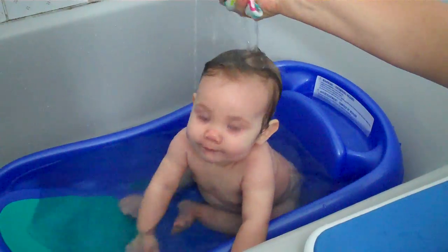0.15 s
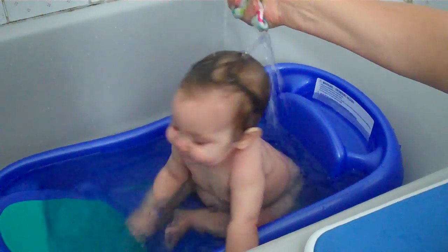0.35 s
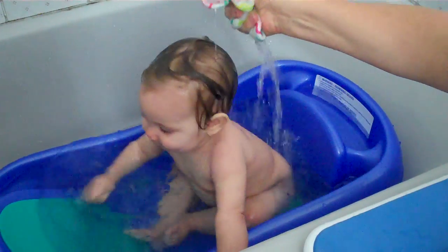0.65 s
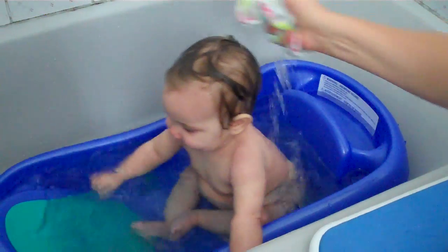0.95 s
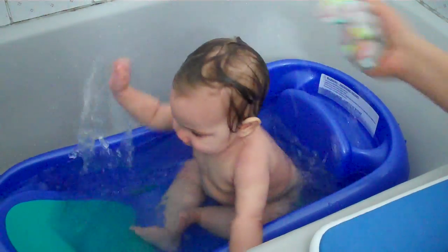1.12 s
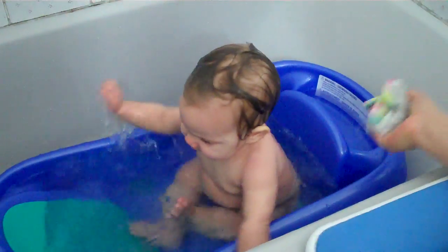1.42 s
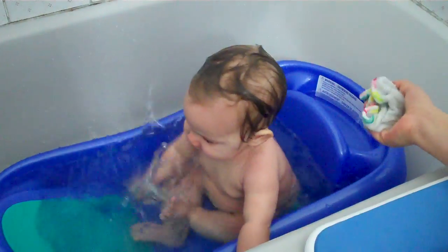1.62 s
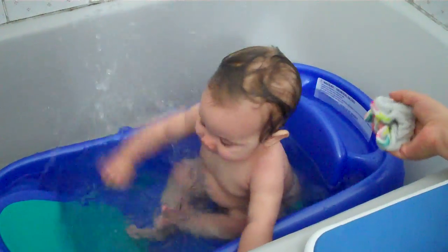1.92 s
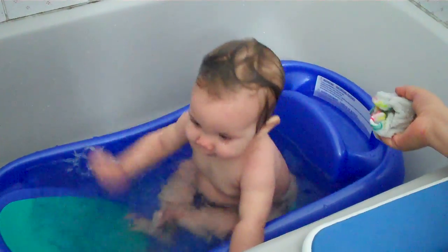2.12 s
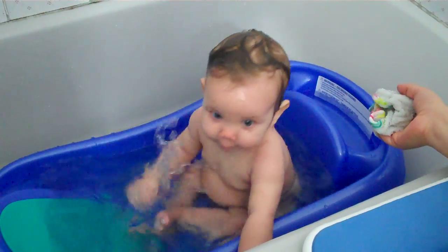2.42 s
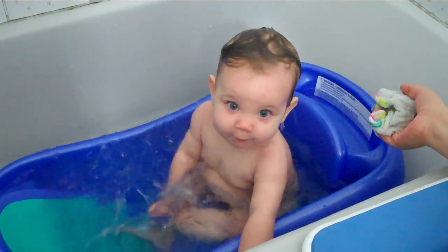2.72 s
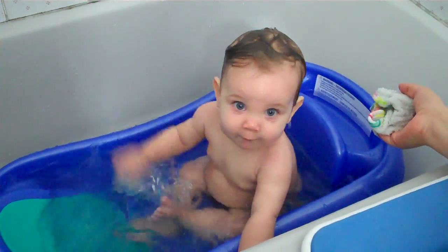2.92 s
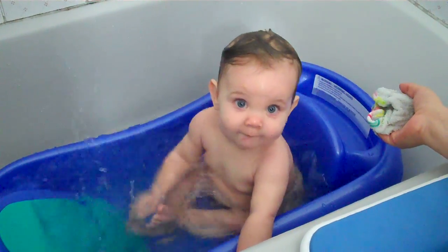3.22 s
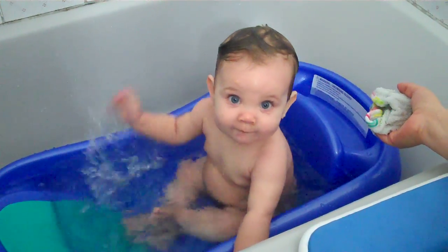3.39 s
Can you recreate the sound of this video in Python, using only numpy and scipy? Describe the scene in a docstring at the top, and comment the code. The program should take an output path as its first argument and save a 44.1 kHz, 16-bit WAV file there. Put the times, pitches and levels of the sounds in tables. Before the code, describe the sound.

A small hand slaps bathwater in a plastic tub, with sharp splashes, plinking droplets and fizz

```python
"""Faint air noise, fizzing water and a few small drops; then a small hand slaps the water of a plastic tub
in a tiled bathroom and a wrung cloth trickles into it. Bubbles are rising, decaying sines; splashes are
filtered clicks with scattered droplets; cracks are noise bursts; the churn is a bank of ringing resonators.
The stream is noise in tub resonances. Tub echoes and a short room tail follow; two close ports pick it up."""
import sys
import numpy as np
from scipy import signal
from scipy.fft import rfft, irfft, next_fast_len
from scipy.io import wavfile
from scipy.ndimage import uniform_filter1d

SR = 44100
rng = np.random.default_rng(int(sys.argv[2]) if len(sys.argv) > 2 else 0)


def generate_wav(signal):
    """Clip the signal to [-1, 1] and save it as 16-bit WAV at the path in sys.argv[1]."""
    frames = np.transpose(np.atleast_2d(signal))
    scaled = np.clip(frames, -1, 1) * 32767
    pcm = np.round(scaled).astype(np.int16)
    wavfile.write(sys.argv[1], SR, pcm)


def gain_from_decibels(decibels):
    """Convert decibel values to linear amplitude factors."""
    exponent = np.asarray(decibels, float) / 20
    return 10 ** exponent


N = 156555
TIME_S = np.arange(N) / SR
EVENT_S = np.arange(SR // 3) / SR


def rms_one(x):
    """Scale to unit rms."""
    return x / np.sqrt(np.mean(x ** 2) + 1e-20)


def at_hz(points, hz):
    """Read a (frequency, value) curve on a log-frequency axis."""
    p = np.array(points, float)
    return np.interp(np.log(hz + 1), np.log(p[:, 0] + 1), p[:, 1])


def shaped(x, gain):
    """Filter by a gain that is a function of frequency."""
    size = next_fast_len(x.shape[-1])
    hz = np.arange(size // 2 + 1) * SR / size
    return irfft(rfft(x, size) * gain(hz), size)[..., :x.shape[-1]]


def band_pass(x, order, low_hz, high_hz):
    """Butterworth band-pass."""
    return signal.sosfilt(signal.butter(order, [low_hz, high_hz], "band", fs=SR, output="sos"), x)


def ring(x, hz, r, zeros):
    """Two-pole resonator with pole radius r."""
    return signal.lfilter(zeros, [1, -2 * r * np.cos(2 * np.pi * hz / SR), r * r], x)


def two_ears(pair, likeness):
    """Mix two unrelated signals to left and right with a set likeness at each frequency."""
    def alike(hz):
        return np.clip(at_hz(likeness, hz), -.99, .99)
    mid = shaped(pair[0], lambda hz: np.sqrt(1 + alike(hz)))
    side = shaped(pair[1], lambda hz: np.sqrt(1 - alike(hz)))
    return np.array([mid + side, mid - side]) / np.sqrt(2)


def grains(per_s, spread_db, size):
    """Random clicks of uneven size and sign."""
    chance, rarity, sign = rng.random((3, size))
    heights = gain_from_decibels(-spread_db * np.log(rarity + 0.0022))
    return (chance < per_s / SR) * heights * np.sign(sign - .5) + 1e-18


def add(out, start_s, sound):
    """Mix a sound in at its start time."""
    i = int(start_s * SR)
    out[i:i + len(sound)] += sound


# CYCLES: cycles per 60 dB of decay; RISE: fractional pitch rise per s
DROP_CYCLES, DROP_RISE_PER_S, GLUG_RISE_PER_S = 40.8, 7, 4.0


def bubble(hz, t60_s, rise_per_s, attack_s, size=None):
    """A decaying sine whose pitch climbs as the bubble nears the surface."""
    t = EVENT_S[:size]
    tone = np.sin(2 * np.pi * hz * (t + rise_per_s * t ** 2 / 2))
    return tone * gain_from_decibels(-60 * t / t60_s) * (1 - np.exp(-t / attack_s))


GRAINS_PER_S, GRAIN_SPREAD_DB, SPLASH_ATTACK_S = 800, 1.67, 0.0014
DROPLETS, DROPLETS_DB, DROPLET_CYCLES, DROPLET_SPREAD_DB = 18, 6.5, 25.6, 5.5


def splash(hz, octaves, t60_s, attack_s=SPLASH_ATTACK_S):
    """Tiny impacts and scattered droplets around one pitch, dying away."""
    half = 2 ** (octaves / 2)
    grit = band_pass(grains(GRAINS_PER_S, GRAIN_SPREAD_DB, len(EVENT_S)), 2, hz / half, hz * half)
    when, pitch, size = rng.random((3, DROPLETS))
    starts_s = np.minimum(when ** 1.5 * t60_s, .3)
    pitches_hz = hz * 2 ** (octaves * (pitch - .5))
    levels = gain_from_decibels(DROPLET_SPREAD_DB * (4.46 * size - 3))
    plinks = np.zeros(2 * len(EVENT_S))
    for start_s, p, level in zip(starts_s, pitches_hz, levels):
        plink = bubble(p, DROPLET_CYCLES / p, DROP_RISE_PER_S, 0.00025, int(SR * 30 / p))
        add(plinks, start_s, level * plink)
    mix = rms_one(grit) + gain_from_decibels(DROPLETS_DB) * plinks[:len(EVENT_S)]
    return mix * gain_from_decibels(-60 * EVENT_S / t60_s) * (1 - np.exp(-EVENT_S / attack_s))


# air noise spectrum: (frequency [Hz], density [dB per Hz])
AIR_SPECTRUM = [(12, -17), (35, -7), (95, -29.5), (140, -17.5), (300, -17), (1000, -15.5), (3500, -13.5),
                (8600, -16.5), (11000, -30), (15000, -74)]
# left-right likeness of the air: (frequency [Hz], likeness [-1..1])
AIR_LIKENESS = [(25, 0.99), (60, 0.88), (600, 0.72), (10000, 0.14)]
AIR_DB = -49.5


def air():
    """Steady coloured noise, less alike left to right in the treble."""
    noise = two_ears(rng.standard_normal((2, N)), AIR_LIKENESS)
    return gain_from_decibels(AIR_DB) * rms_one(shaped(noise, lambda hz: gain_from_decibels(at_hz(AIR_SPECTRUM, hz))))


# fizz of the water over time: (time [s], level [dB])
CHURN_LEVEL = [(0, -67), (.2, -59), (.26, -43.5), (.5, -49), (.62, -34.5), (1.05, -44), (1.35, -40.5),
               (1.58, -43), (1.8, -38), (2.15, -37), (2.4, -40.5), (2.53, -44.5), (2.7, -41.5), (2.98, -47),
               (3.15, -43), (3.36, -49.5), (3.55, -47)]
# fizz spectrum: (frequency [Hz], density [dB per Hz])
FIZZ_SPECTRUM = [(240, -42), (400, -23), (1370, -11.5), (2390, 0), (8820, 1), (12700, -4.5), (14300, -46)]
FIZZ_PER_S, FIZZ_CYCLES, FIZZ_SPREAD_DB, FIZZ_DB = 800, 43.5, 3, -1
HISS_SHARE, FIZZ_BANDS = 0.095, 24


def churn():
    """Small bubbles of many sizes ring over a smooth hiss; rougher water makes them more uneven."""
    db = np.interp(TIME_S, *np.transpose(CHURN_LEVEL))
    roughness = np.clip((db + 49.5) / 15.0, .3, 1)
    clicks = grains(FIZZ_PER_S, FIZZ_SPREAD_DB * roughness, N)
    dealt = rng.integers(0, FIZZ_BANDS, N)  # the band each click rings
    hiss = clicks.std() * rng.standard_normal(N)
    fizz = np.zeros(N)
    for k, hz in enumerate(np.geomspace(500, 12000, FIZZ_BANDS)):
        drive = clicks * (dealt == k) + HISS_SHARE * hiss
        band = rms_one(ring(drive, hz, gain_from_decibels(-60 * hz / (FIZZ_CYCLES * SR)), [0, 1]))
        fizz += gain_from_decibels(at_hz(FIZZ_SPECTRUM, hz)) * np.sqrt(hz) * band  # sqrt(hz): band width
    return gain_from_decibels(db + FIZZ_DB) * rms_one(fizz)


# water heaves against the tub: (time [s], relative level [dB], pitch [Hz])
HEAVES = [(0.015, -46.5, 307), (0.48, -44.5, 393), (0.556, -36.5, 281), (0.61, -42, 148), (1.341, -38, 420),
          (2.059, -35.5, 449), (2.575, -33, 480), (2.619, -30.5, 603), (2.77, -42, 680), (3.026, -35, 620),
          (3.223, -36.5, 577)]
HEAVE_DB, HEAVE_BUBBLE_DB, HEAVE_OCTAVES = -7, -5, 0.68
HEAVE_T60_S, HEAVE_ATTACK_S = 0.23, 0.0043


def heaves():
    """Low splashes, each with a low bubble."""
    out = np.zeros(N + SR)
    for s, db, hz in HEAVES:
        slosh = splash(hz, HEAVE_OCTAVES, HEAVE_T60_S, HEAVE_ATTACK_S)
        tone = bubble(hz, HEAVE_T60_S / 2, GLUG_RISE_PER_S, HEAVE_ATTACK_S)
        add(out, s, gain_from_decibels(db + HEAVE_DB) * (slosh + gain_from_decibels(HEAVE_BUBBLE_DB) * tone))
    return out[:N]


# slaps and drops: (time [s], relative level [dB], pitch [Hz], splash t60 [s], splash re bubble [dB])
DROPS = [(0.0425, -30.5, 3200, 0.098, -33), (0.5254, -25, 2700, 0.041, -24),
         (0.5444, -12, 3020, 0.12, -14.5), (0.6011, -11, 4860, 0.053, -11), (0.6168, -22.5, 2400, 0.2, -5),
         (0.6411, -11.5, 3070, 0.15, -7.5), (0.6742, -18.5, 1650, 0.12, -9),
         (0.7572, -31.5, 1760, 0.12, -2), (0.7826, -20, 3700, 0.17, -8), (0.9369, -24, 2940, 0.1, -4.5),
         (0.9709, -14.5, 1900, 0.14, -19), (1.0459, -15, 5000, 0.034, -13.5),
         (1.1159, -30, 2520, 0.31, -5.5), (1.1958, -18, 3120, 0.094, -13), (1.2375, -18, 2730, 0.1, -13.5),
         (1.3107, -24.5, 2890, 0.083, -10), (1.3546, -19, 4230, 0.11, -18), (1.372, -20, 2250, 0.14, -13),
         (1.3939, -12, 2910, 0.1, -10.5), (1.466, -23, 2370, 0.075, -14.5), (1.6201, -26.5, 4000, 0.073, 1),
         (1.713, -33.5, 2140, 0.39, -3.5), (1.7671, -15, 2140, 0.31, -9),
         (1.9918, -22.5, 2560, 0.098, -16.5), (2.0169, -23, 2850, 0.089, -6),
         (2.0376, -18.5, 2940, 0.098, -1.5), (2.1312, -18.5, 5250, 0.15, -5.5),
         (2.2643, -30.5, 3200, 0.49, 3.5), (2.391, -9, 2760, 0.07, -10.5), (2.559, -21.5, 3050, 0.053, -9),
         (2.592, -13, 2440, 0.18, -14), (2.6824, -19, 1820, 0.22, -13), (2.719, -21, 2400, 0.097, -11.5),
         (2.775, -18, 4430, 0.083, -4.5), (2.874, -23, 3540, 0.17, -8.5), (3.0078, -35.5, 1660, 0.36, 1),
         (3.12, -25, 3400, 0.12, -5), (3.1463, -19.5, 2240, 0.2, -10), (3.2242, -7, 2700, 0.24, -19),
         (3.4057, -25, 2240, 0.15, -10.5)]
DROP_DB, DROP_OCTAVES = -2, 1.42


def drops():
    """Plinking bubbles, each in a splash."""
    out = np.zeros(N + SR)
    for s, db, hz, t60_s, splash_db in DROPS:
        plink = bubble(hz, DROP_CYCLES / hz, DROP_RISE_PER_S, 0.00018)
        add(out, s, gain_from_decibels(db + DROP_DB) * (plink + gain_from_decibels(splash_db) * splash(hz, DROP_OCTAVES, t60_s)))
    return out[:N]


# falling-water ticks with spray: (time [s], relative level [dB], pitch [Hz], relative spray level [dB])
SPRAYS = [(0.0425, -29, 7100, -11.5), (0.5314, -26, 5170, -5), (0.5633, -19, 5700, -8.5),
          (0.7589, -21, 5260, -8.5), (0.8062, -17.5, 5150, -12), (0.8268, -22.5, 6850, -7),
          (0.8478, -26, 6200, -8.5), (0.8867, -13, 9300, -8.5), (0.9349, -20, 5250, -7),
          (1.0009, -27, 5100, -4), (1.1479, -17.5, 6500, -11.5), (1.3225, -18, 8200, -13),
          (1.3734, -13, 7500, -8), (1.6147, -19.5, 5300, -6), (1.7236, -17.5, 6560, -7),
          (2.039, -25, 4900, -5), (2.2516, -22, 6000, -5), (2.2676, -14.5, 5300, -4),
          (2.3958, -6.5, 6540, -10), (2.7731, -19, 4900, -8), (2.9027, -22, 6540, -9),
          (3.0054, -25.5, 4870, -6), (3.1103, -18, 7700, -10), (3.224, -10.5, 5660, -7.5),
          (3.5409, -27.5, 7100, -11.5)]
SPRAY_TICK_DB, TICK_CYCLES, SPRAY_OCTAVES, SPRAY_T60_S = 1.5, 33, 1.44, .08


def sprays():
    """Steady-pitch ticks, each with a fizzing spray."""
    out = np.zeros(N + SR)
    for s, db, hz, spray_db in SPRAYS:
        tick = gain_from_decibels(SPRAY_TICK_DB) * bubble(hz, TICK_CYCLES / hz, 0, .00005)
        add(out, s, gain_from_decibels(db) * (tick + gain_from_decibels(spray_db) * splash(hz, SPRAY_OCTAVES, SPRAY_T60_S)))
    return out[:N]


# lone drips: (time [s], level [dB], pitch [Hz])
DRIPS = [(.123, -38.5, 2170), (.132, -33, 4300), (.245, -35, 3050), (.647, -13.5, 2110), (.655, -17, 4700),
         (.689, -21.5, 1377), (2.6, -23.5, 1990), (2.744, -22, 2820), (3.06, -28.5, 1350),
         (3.153, -23, 2460), (3.172, -22, 3530), (3.177, -28, 1600)]


def drips():
    """One clean small bubble per drip."""
    out = np.zeros(N + SR)
    for s, db, hz in DRIPS:
        add(out, s, gain_from_decibels(db) * bubble(hz, DROP_CYCLES / hz, DROP_RISE_PER_S, 0.0003))
    return out[:N]


# big trapped bubbles: (time [s], relative level [dB], pitch [Hz])
GLUGS = [(0.465, -46, 790), (0.627, -27, 780), (0.674, -30, 1330), (0.723, -29, 741), (0.789, -29, 947),
         (0.92, -27, 702), (1.372, -31, 1210), (1.621, -34, 778), (1.718, -23.5, 1128),
         (1.788, -21.5, 1060), (2.045, -17.5, 1166), (2.145, -23, 1308), (2.27, -34.5, 923),
         (2.346, -28.5, 982), (2.385, -20.5, 1390), (2.571, -27.5, 983), (2.773, -19.5, 1253),
         (2.873, -35.5, 1210), (3.124, -35, 1080), (3.225, -12, 1155), (3.439, -26, 1010)]
GLUG_DB, GLUG_CYCLES, GLUG_ATTACK_S = -2, 90, 0.00028
FOAM_DB, FOAM_OCTAVES = -9.5, 0.8


def glugs():
    """Big trapped bubbles ring long inside foam."""
    out = np.zeros(N + SR)
    for s, db, hz in GLUGS:
        t60_s = GLUG_CYCLES / hz
        tone = bubble(hz, t60_s, GLUG_RISE_PER_S, GLUG_ATTACK_S)
        add(out, s, gain_from_decibels(db + GLUG_DB) * (tone + gain_from_decibels(FOAM_DB) * splash(hz, FOAM_OCTAVES, 2 * t60_s)))
    return out[:N]


# palm cracks flat on the surface: (time [s], level [dB], pitch [Hz])
CRACKS = [(0.6408, -1.5, 3770), (0.6767, -10, 1730), (2.3952, -6.5, 2970), (3.2255, -5.5, 2000)]
CRACK_T60_S = 0.0088


def cracks():
    """Decaying noise snaps, strongest around their pitch, with gentle band edges."""
    out = np.zeros(N + SR)
    for s, db, hz in CRACKS:
        snap = rng.standard_normal(len(EVENT_S)) * gain_from_decibels(-60 * EVENT_S / CRACK_T60_S)
        burst = band_pass(snap, 1, 0.57 * hz, 1.58 * hz)
        add(out, s, gain_from_decibels(db) * burst / np.abs(burst).max())
    return out[:N]


# tub resonances: (frequency [Hz], width [Hz], level [dB])
TUB_MODES = [(217, 11, -3.5), (324, 35, 1), (620, 110, 3)]
POUR_START_S, POUR_END_S, POUR_EDGE_S, POUR_DB = 0.76, 0.9648, 0.01, -51


def pour():
    """The wrung stream drums the tub floor: noise through low tub resonances."""
    white = rng.standard_normal(N)
    rings = np.zeros(N)
    for hz, width_hz, db in TUB_MODES:
        rings += gain_from_decibels(db) * rms_one(ring(white, hz, np.exp(-np.pi * width_hz / SR), [1, 0, -1]))
    inside_s = np.minimum(TIME_S - POUR_START_S, POUR_END_S - TIME_S)
    return gain_from_decibels(POUR_DB) * rings * np.clip(inside_s / POUR_EDGE_S + .5, 0, 1)


PUSH_S, PUSH_DB, PUSH_LENGTH_S = 1.9, -42, .0012


def air_push():
    """A push of air reaches the ports: one Gaussian pressure pulse."""
    return gain_from_decibels(PUSH_DB) * np.exp(-((TIME_S - PUSH_S) / PUSH_LENGTH_S) ** 2)


# tub-wall echoes: (delay [s], level [dB])
TUB_ECHOES = [(.0055, -13.5), (.0115, -11), (.021, -8.5), (.033, -9.5)]
# room decay: (frequency [Hz], t60 [s])
ROOM_T60 = [(200, 0.4), (1000, 0.32), (4000, 0.31), (12000, 0.24)]
# left-right likeness of the tail: (frequency [Hz], likeness [-1..1])
ROOM_LIKENESS = [(60, 0.97), (180, 1), (550, 1), (1640, 0.89), (4960, 0.39), (14900, 0.56)]
ROOM_DB, ROOM_ATTACK_S, ECHO_CUT_HZ = -5.5, 0.0077, 8400


def bathroom(x):
    """Direct sound, quick dulled tub echoes and a diffuse tail that dies faster in the treble."""
    t = np.arange(SR // 2) / SR
    white = rng.standard_normal((2, len(t)))
    tail = np.zeros_like(white)
    for hz in 180 * 2. ** np.arange(7):
        band = band_pass(white, 2, hz / np.sqrt(2), hz * np.sqrt(2))
        tail += band * gain_from_decibels(-60 * t / at_hz(ROOM_T60, hz)) * (1 - np.exp(-t / ROOM_ATTACK_S))
    answer = two_ears(tail, ROOM_LIKENESS)
    answer = gain_from_decibels(ROOM_DB) * answer / np.sqrt(np.sum(answer ** 2) / 2)
    echoes = np.zeros_like(answer)
    for k, (lag_s, db) in enumerate(TUB_ECHOES):
        i = int(lag_s * SR)
        echoes[0, i] += gain_from_decibels(db)
        echoes[1, i + 3 * (-1) ** k] += gain_from_decibels(db)  # right alternates 3 samples late, early
    dull = np.exp(-2 * np.pi * ECHO_CUT_HZ / SR)
    answer += signal.lfilter([1 - dull], [1, -dull], echoes)
    answer[:, 0] += 1  # direct sound
    return signal.fftconvolve(x[None], answer, axes=1)[:, :N]


BASS_CUT_HZ = 240


def scene():
    """Bass-cut water events, churn and pour in the bathroom, plus air noise and push."""
    events = heaves() + drops() + sprays() + drips() + glugs() + cracks()
    high_pass = signal.butter(3, BASS_CUT_HZ, "high", fs=SR, output="sos")
    water = signal.sosfilt(high_pass, events) + churn() + pour()
    return bathroom(water) + air() + air_push()


# port colour: (frequency [Hz], left minus right [dB])
PORT_DB = [(60, -1), (500, -1.5), (2400, -0.5), (4400, 0.5), (8000, -6.5), (13000, 0.5)]
# port phase: (frequency [Hz], left lead [rad])
PORT_PHASE = [(0, 1), (3360, 0), (7410, 1.18), (9560, 1.5), (15100, 5.5)]


def two_ports(x):
    """Split the colour and phase difference evenly between the ports."""
    def left(hz):
        return gain_from_decibels(at_hz(PORT_DB, hz) / 2) * np.exp(.5j * at_hz(PORT_PHASE, hz))
    return np.array([shaped(x[0], left), shaped(x[1], lambda hz: 1 / left(hz))])


# SHARE: dB of cut per dB of held level over the knee; FALL: of the held level
AGC_KNEE_DB, AGC_SHARE, AGC_FALL_DB_PER_S = -25, 0.076, 33


def gain_control(x):
    """Loud moments pull the gain down; it creeps back slowly."""
    level_db = 10 * np.log10(uniform_filter1d(np.mean(x ** 2, axis=0), size=441) + 1e-12)
    creep_db = AGC_FALL_DB_PER_S * TIME_S
    held_db = np.maximum.accumulate(level_db + creep_db) - creep_db
    over_db = uniform_filter1d(np.maximum(held_db - AGC_KNEE_DB, 0), size=221)
    return x * gain_from_decibels(-AGC_SHARE * over_db)


def band_limit(x):
    """A steep low-pass at the top of the band."""
    return signal.sosfilt(signal.butter(12, 15540, fs=SR, output="sos"), x)


CUTOFF_HZ = 12300


def record(dry):
    """Two ports, gain control, then a steep treble cut."""
    low_pass = signal.butter(10, CUTOFF_HZ, fs=SR, output="sos")
    mix = signal.sosfilt(low_pass, gain_control(two_ports(dry)))
    return band_limit(mix)


dry = scene()
out = record(dry)
generate_wav(out)
```